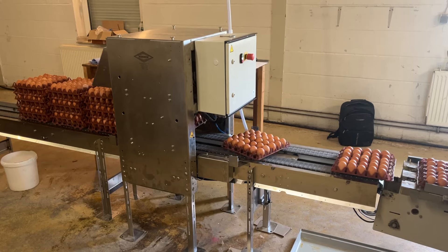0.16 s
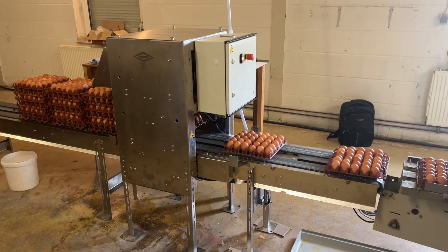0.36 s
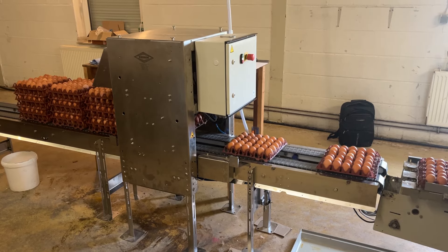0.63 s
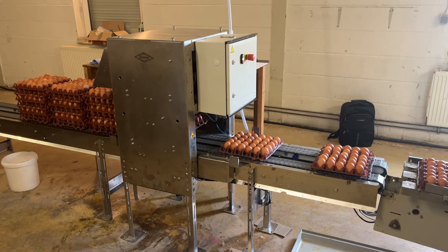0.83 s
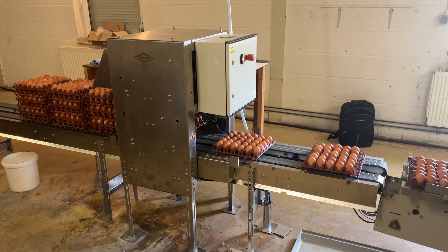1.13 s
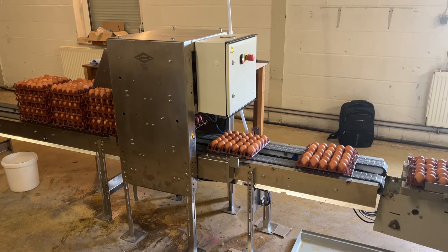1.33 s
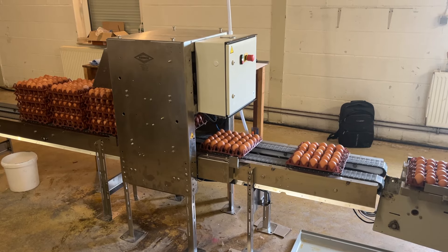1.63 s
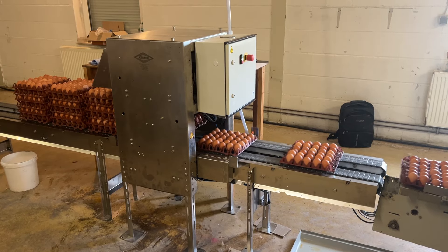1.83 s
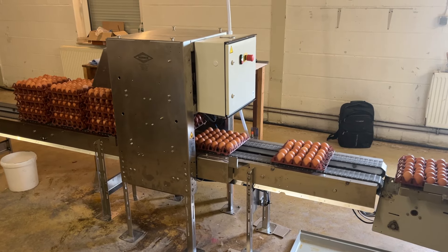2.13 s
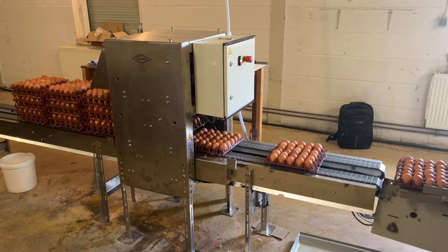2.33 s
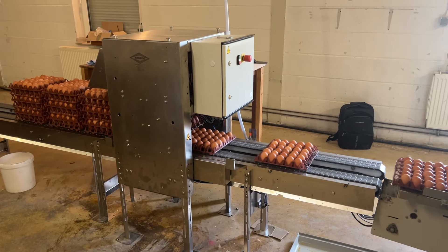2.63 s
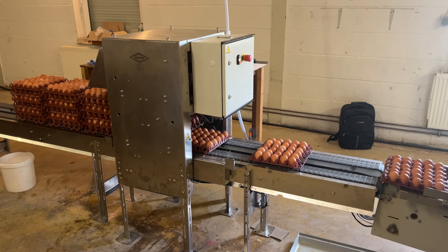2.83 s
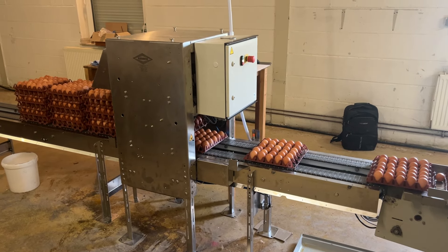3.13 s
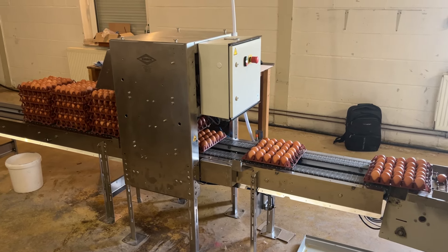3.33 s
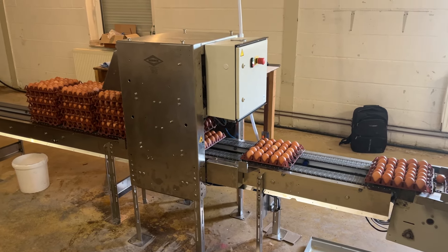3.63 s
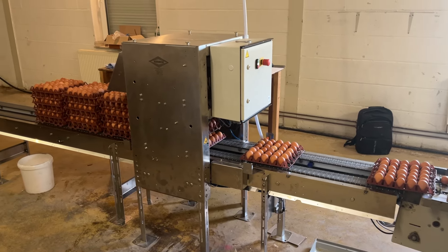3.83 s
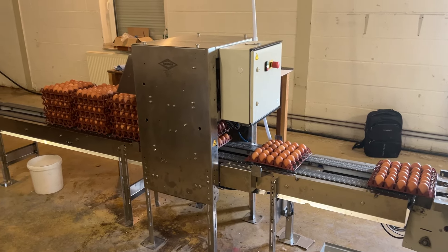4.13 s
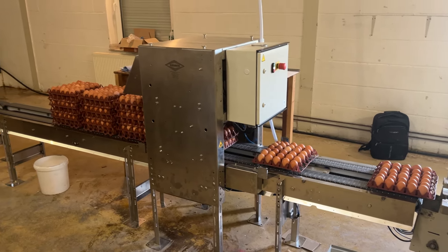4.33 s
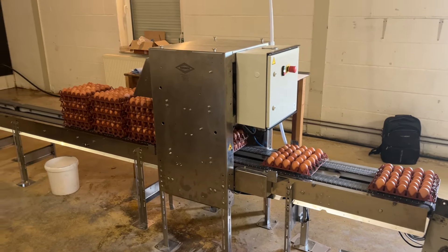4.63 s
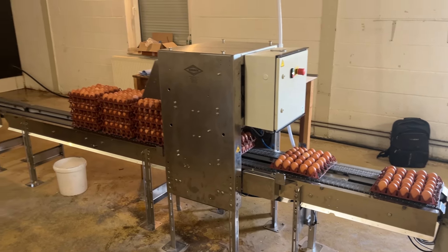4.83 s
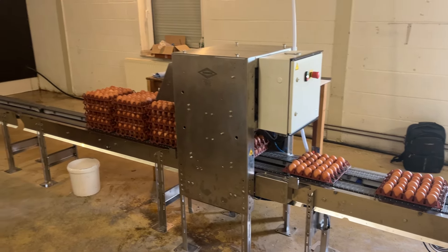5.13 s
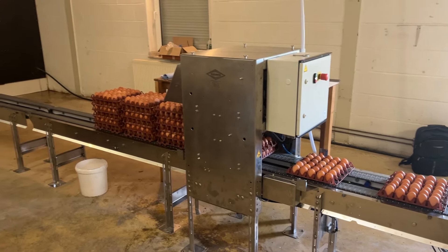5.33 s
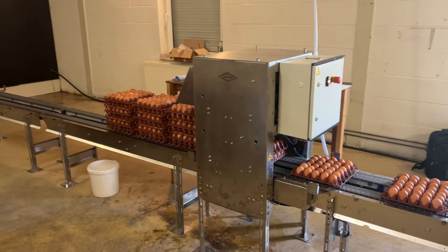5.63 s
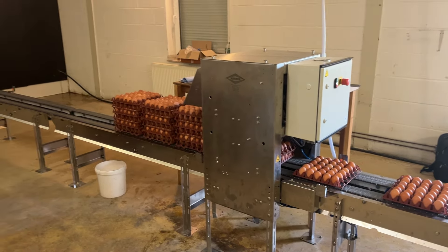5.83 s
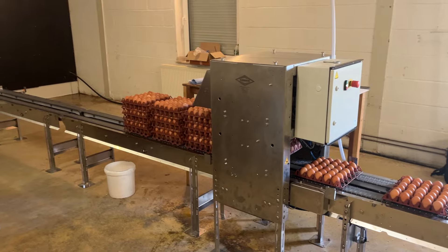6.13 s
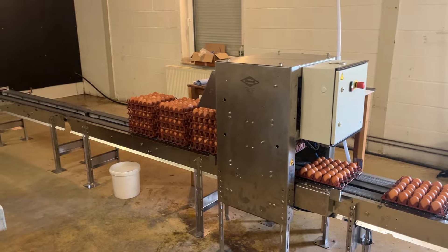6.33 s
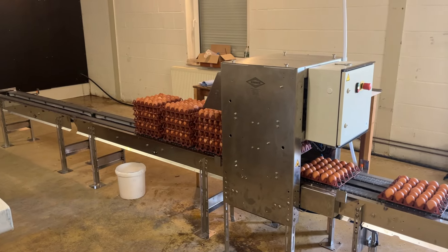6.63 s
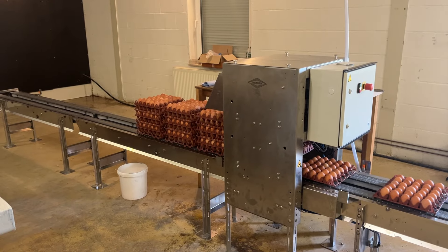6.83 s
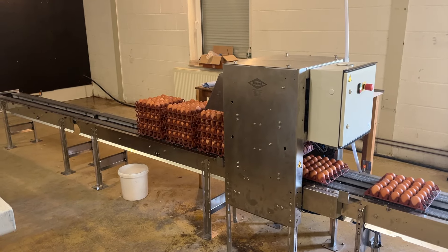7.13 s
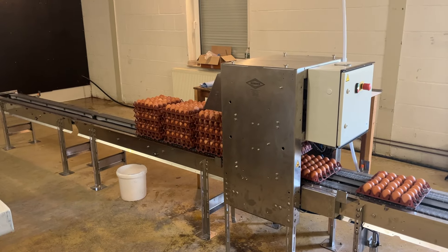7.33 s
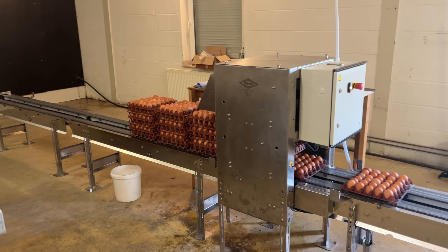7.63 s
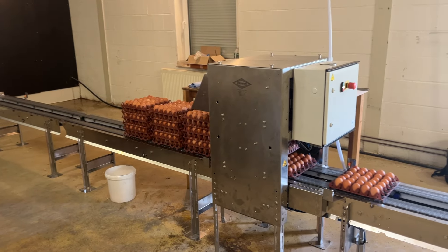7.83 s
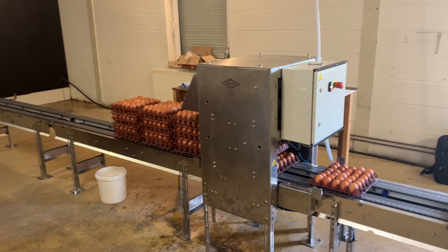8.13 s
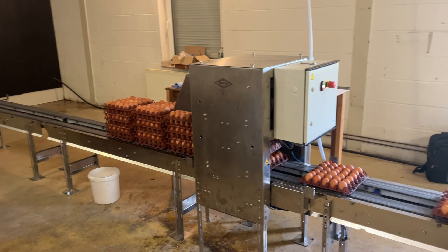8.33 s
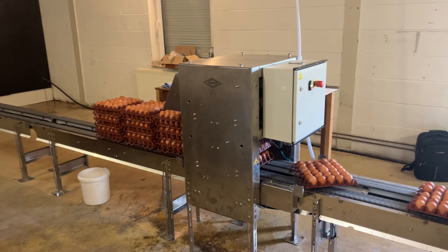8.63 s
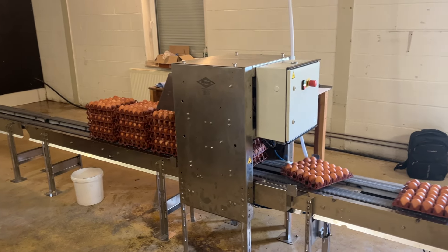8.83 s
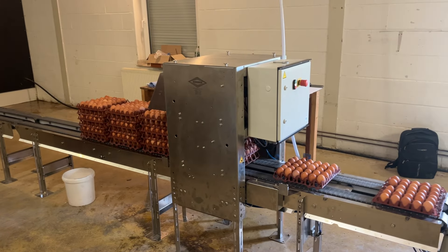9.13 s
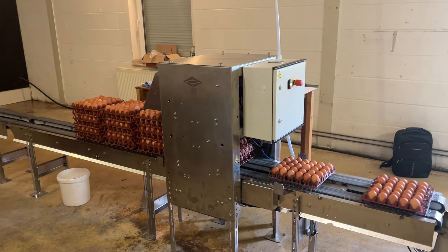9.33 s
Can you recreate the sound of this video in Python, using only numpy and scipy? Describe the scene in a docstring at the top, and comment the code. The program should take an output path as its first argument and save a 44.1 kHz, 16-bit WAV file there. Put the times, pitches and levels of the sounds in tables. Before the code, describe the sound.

An egg-tray stacking line runs without stopping. The first conveyor stroke is soft; later ones repeat evenly as rattling links with a mid-high metallic chirp. Lifting gear thuds and clanks inside a steel box, growing denser and heavier around the middle. Trays clack sharply, with clustered squeaks just after five seconds and again near the end. A close stereo pair hears low machine roar, fine hiss and hard-walled room echo.

```python
"""Bare concrete packing room; a closely spaced microphone pair a few metres from an egg-tray stacker.
From the start its frame rumbles, and the chain conveyor chatters and chirps in even strokes, the first softest.
Knocks of the lifting gear boom in the housing from 0.1 s on, and the lower middle dips briefly at 0.3 s.
From 0.5 s plastic trays clack on the rails; scrapes and squeaks follow at once, then cluster at 5.1 and 9.4 s.
Showers of tiny contacts pass through filters and resonances; the chirps and squeaks are wavering sines."""
import sys
import numpy as np
from scipy import signal
from scipy.fft import rfft, irfft, next_fast_len
from scipy.io import wavfile

SR = 44100
rng = np.random.default_rng(int(sys.argv[2]) if len(sys.argv) > 2 else 0)


def to_wav(s):
    """Save 16-bit WAV."""
    ch = np.atleast_2d(s).T  # columns
    pcm = np.round(np.clip(ch, -1, 1) * 32767)  # PCM
    wavfile.write(sys.argv[1], SR, pcm.astype(np.int16))


N = 417627
TIME = np.arange(N) / SR
SIZE = 2 * next_fast_len(N // 2 + SR // 2)
FREQS = np.maximum(np.fft.rfftfreq(SIZE, 1 / SR), 1)

# the first links of each stroke carry the load
FIRST_STROKE_S, STROKE_EVERY_S, LINK_EVERY_S, LAST_LOADED_LINK = 0.058, 0.8713, 0.0655, 3

# level (dB), loss per link (dB) and dying time (s) of the chatter; then the grind and chirp in the teeth
CHATTER_DB, CHATTER_FADE_DB, CHATTER_DYING_S = -22, 1.5, 0.027
CHIRP_DB, GRIND_DB, SLACK_LOSS_DB, CHIRP_DYING_S = -18, -24.5, 5.5, 0.01
SPROCKET_HZ, RUB_LEAD_S, LINK_UNEVEN_DB = 2215, 0.003, 1.5
# Resonances of the sprocket. Each row: pitch in Hz, width in Hz, relative level in dB.
SPROCKET_MODES = [(1330, 70, -12), (2060, 140, -10), (2222, 35, -8), (2400, 220, -7)]
# Colour of the link chatter. Each row: frequency in Hz, relative density in dB per Hz.
LINK_COLOUR = [(200, -4.5), (500, 8), (900, 3), (1400, 17.5), (1800, 3), (2500, -4), (4000, -3), (7000, 0),
               (14000, -32)]


def chain():
    """Links chatter onto the sprocket; each grinds into its tooth and chirps at an unsteady pitch."""
    hits, grinds, rubs = [], [], []
    for s, k, db, chirp_db in links():
        # a loaded link grinds and chirps much more readily than a slack one
        slack_db = SLACK_LOSS_DB * max(k - LAST_LOADED_LINK, 0)
        hit_db = db + rng.normal(0, LINK_UNEVEN_DB) + CHATTER_DB - CHATTER_FADE_DB * k
        hits.append((s, hit_db, CHATTER_DYING_S))
        grinds.append((s - RUB_LEAD_S, db + GRIND_DB - slack_db, CHIRP_DYING_S))
        rubs.append((s - RUB_LEAD_S, chirp_db + CHIRP_DB - slack_db, CHIRP_DYING_S))
    chatter = contacts(7000, 2) * blows(hits, rise_s=.003)
    hz = SPROCKET_HZ * (1 + .026 * drift(1000) + .007 * drift(25))
    chirp = np.sin(2 * np.pi * np.cumsum(hz) / SR) * blows(rubs, rise_s=.006)
    grinding = contacts(4000, 1) * blows(grinds, rise_s=.006)
    return chirp + resonate(grinding, SPROCKET_MODES) + coloured(chatter, LINK_COLOUR)


# Strokes in turn. Each row: relative strength in dB, then the relative chirp of its four loaded links in dB.
STROKE_STRENGTHS = [(-7.5, 0, -15, -2.5, 0), (-2.5, 0, 0.5, 0.5, 0), (-2, -1, 0, 2, 4.5),
                    (-0.5, 0, 5.5, 1.5, 5), (0, -4, 3.5, -2, -1), (0, -3, -5, -1, -4),
                    (1.5, -0.5, 3, -8, 3), (0.5, -3, 0.5, -3, -5), (0, -5, -1, 0, -2), (0, -8, -8, 2, 2),
                    (0.5, 0, 0, 4, 3.5)]


def links(count=7):
    """(s, place in its stroke, strength dB, chirp dB) of every link that meets the sprocket."""
    rows = []
    for start, (db, *chirps) in zip(strokes(), STROKE_STRENGTHS):
        for k in range(count):
            chirp_db = chirps[k] if k < len(chirps) else np.mean(chirps)
            rows.append((start + (k + .5) * LINK_EVERY_S, k, db, chirp_db))
    return rows


def strokes():
    """Start times of the conveyor's strokes, strictly in time."""
    return np.arange(FIRST_STROKE_S, N / SR, STROKE_EVERY_S)


def travel(start_s=0.011, run_s=0.44, coast_s=0.07):
    """Motion of the chain, 0 at rest to 1: it starts up, runs and coasts to a stop in every stroke."""
    age = (TIME - FIRST_STROKE_S) % STROKE_EVERY_S
    return np.minimum(age / start_s, 1) * np.exp(-np.maximum(age - run_s, 0) / coast_s)


# Colour of small bright ticks. Each row: frequency in Hz, relative density in dB per Hz.
TICK_COLOUR = [(500, -24), (1500, -9), (3000, -5), (5000, -2), (8000, 0), (12000, 0), (15000, -7)]


def rollers(hiss_db, count=26):
    """The conveyor's rollers tick twice per link with uneven force, among stray little clicks."""
    times = np.ravel(strokes()[:, None] + np.arange(count) * LINK_EVERY_S / 2)
    forces_db = 5.5 + 2.5 * rng.standard_normal(len(times))
    even = blows([(s, db, .0028) for s, db in zip(times, forces_db)], rise_s=.0003)
    stray = from_db(-15) * contacts(25, 4)
    return from_db(hiss_db) * coloured(contacts(7000, 0.85) * even + stray, TICK_COLOUR)


SNAP_DB, SNAP_FALL_DB = -21.5, 2.5  # the fall is per link away from the last loaded one
# The pawl catches and lets go. Each row: seconds into the stroke, relative level in dB.
PAWL_CLICKS = [(0.0, -26), (0.488, -21.5)]


def ticks():
    """Bright contacts: the pawl catches and lets go; links snap on their guides as the load comes off."""
    snaps = [(s, db + SNAP_DB - SNAP_FALL_DB * abs(k - LAST_LOADED_LINK)) for s, k, db, _ in links()]
    snaps += [(s + after, db) for s in strokes() for after, db in PAWL_CLICKS]
    uneven = [(s, db + rng.normal(0, LINK_UNEVEN_DB), .0035) for s, db in snaps]
    return coloured(contacts(14000, 1.2) * blows(uneven, rise_s=.0008), TICK_COLOUR)


TRAY_KNOCK_DB = 0  # a tray's knock on the housing, against its clack
LIFT_CRACK_DB = -3.5  # noisy crack of a lifting knock, against its clank
LIFT_THUD_DB = -10.5  # dull thud of a lifting knock, against its boom
# The drive brakes, stops and swings back.
# Each row: seconds into the stroke, relative knock in dB, relative thud in dB.
DRIVE_KNOCKS = [(0.425, -49, -29), (0.492, -29, -34.5), (0.56, -50, -33.5), (0.608, -27.5, -43),
                (0.644, -26, -27), (0.785, -29, -36)]
# Colours of knock and thud. Each row: frequency in Hz, relative density in dB per Hz.
KNOCK_COLOUR = [(150, -38), (420, -4.5), (600, -7.5), (800, -3.5), (1500, 1), (1800, -13.5), (2600, -10.5),
                (4500, -12), (12000, -30)]
THUD_COLOUR = [(25, -14), (55, 16), (90, -0.5), (170, 12), (300, 9.5), (450, 1.5), (800, 0.5), (3000, -44)]
# Resonances of the steel frame. Each row: pitch in Hz, width in Hz, relative level in dB.
FRAME_MODES = [(83.6, 7.8, -14), (163, 16, -16), (231, 33, -16.5), (306, 10, -26)]


def stacker(load_db):
    """The drive, lifting gear and landing trays knock on the housing and make its frame boom."""
    # the drive knocks harder when the whole line works harder
    loads = np.interp(strokes(), TIME, load_db)
    hits = []
    for s, load in zip(strokes(), loads):
        hits += [(s + after, knock_db + load, thud_db + load) for after, knock_db, thud_db in DRIVE_KNOCKS]
    hits += [(s, db + TRAY_KNOCK_DB, thud_db) for s, db, *_, thud_db in TRAY_CLACKS]
    hits += [(s, knock_db + LIFT_CRACK_DB, boom_db + LIFT_THUD_DB)
             for s, knock_db, boom_db, favoured in LIFT_KNOCKS]
    knocks = contacts(6000, 2.1) * blows([(s, db, .022) for s, db, _ in hits], rise_s=0.0017)
    thuds = contacts(6000, 1.0) * blows([(s, db, .026) for s, _, db in hits], rise_s=0.0077)
    return coloured(knocks, KNOCK_COLOUR) + coloured(thuds, THUD_COLOUR) + resonate(thuds, FRAME_MODES)


# a mode's loss per octave away from the favoured pitch, and the most it loses (dB)
HOUSING_FOCUS_DB, HOUSING_MOST_LOSS_DB = 19, 18
# The lifting gear sets trays down in the housing. Each row: start in seconds, relative knock in dB,
# relative boom in dB, pitch in Hz that the point of contact favours.
LIFT_KNOCKS = [(0.119, -36, -28.5, 303), (0.152, -31, -25.5, 520), (0.214, -28.5, -29, 271),
               (0.246, -38, -35, 139), (0.347, -32, -44, 200), (0.414, -31, -45, 200),
               (0.693, -26, -35, 300), (0.979, -23, -33, 305), (1.095, -44, -26, 80),
               (1.125, -42, -26.5, 200), (1.359, -44, -23.5, 480), (1.571, -26.5, -27, 151),
               (1.85, -32, -23, 500), (1.903, -24, -26, 300), (1.968, -28, -27, 278), (2.01, -38, -29, 135),
               (2.166, -34, -35, 300), (2.428, -30, -40, 296), (2.707, -24, -20.5, 580),
               (2.961, -38, -42, 300), (3.105, -26, -21, 470), (3.16, -24, -22, 170),
               (3.308, -22.5, -24, 470), (3.458, -39, -24.5, 500), (3.651, -22, -39, 470),
               (4.118, -42, -20, 62), (4.199, -30, -28, 260), (4.447, -27, -23.5, 570),
               (4.60, -30, -28, 400), (4.658, -26, -21, 260), (4.718, -24, -21, 70),
               (4.908, -32, -21.5, 300), (4.98, -20.5, -21, 168), (5.136, -18, -20, 132),
               (5.298, -36, -21.5, 283), (5.32, -25, -27, 563), (5.365, -34, -26, 400),
               (5.612, -41, -19.5, 115), (5.709, -34, -22.5, 457), (5.808, -26, -13.5, 67),
               (6.193, -27, -32, 387), (6.254, -25, -24, 252), (6.321, -22, -23, 550),
               (6.384, -25, -21, 80), (6.45, -31, -32, 385), (6.665, -27, -38, 380), (6.718, -38, -22, 530),
               (7.192, -30, -29, 305), (7.263, -28, -39, 305), (7.312, -27, -35, 305),
               (7.455, -32, -24, 490), (7.517, -28, -22, 199), (7.672, -31, -16.5, 183),
               (7.83, -26, -24, 260), (7.998, -20.5, -37, 560), (8.328, -37, -25, 500),
               (8.385, -44, -21.5, 250), (8.447, -44, -21, 168), (8.537, -26, -33, 504),
               (8.864, -21, -28, 600), (9.048, -40, -19, 135), (9.220, -28, -21, 474),
               (9.278, -42, -24, 200)]
# Modes of the steel housing. Each row: pitch in Hz, 60 dB decay in seconds, relative level in dB.
HOUSING_MODES = [(56, 0.15, 1), (79, 0.18, -0.5), (108.5, 0.26, -2), (134.6, 0.25, -3), (162, 0.26, 0),
                 (211, 0.22, -1), (256.4, 0.24, -4), (301.7, 0.28, 1.5), (378, 0.19, -2.2),
                 (464.5, 0.17, -1.5), (519.5, 0.35, -4.5), (593.5, 0.28, -1.5)]


def booms():
    """Each knock of the lifting gear rings the housing: deep on the frame, higher on a panel."""
    rows = [(s, boom_db, favoured) for s, knock_db, boom_db, favoured in LIFT_KNOCKS]
    return struck(rows, HOUSING_MODES, HOUSING_FOCUS_DB, HOUSING_MOST_LOSS_DB)


# Resonances of the outer panels. Each row: pitch in Hz, width in Hz, relative level in dB.
PANEL_MODES = [(660, 28, -6), (830, 30, -8), (970, 28, -6), (1090, 30, -6), (1185, 28, -5), (1330, 28, -3),
               (1420, 34, -7), (1520, 28, -3), (1850, 40, -10), (2420, 45, -9)]


def clanks():
    """The hard edge of each lifting knock makes the thin outer panels clank."""
    force = blows([(s, db, .01) for s, db, *_ in LIFT_KNOCKS], rise_s=.003)
    return resonate(contacts(9000, 1) * force, PANEL_MODES)


SETTLE_S = 0.008  # from a tray's first touch to its full blow on the rail
RAIL_FOCUS_DB, RAIL_MOST_LOSS_DB = 85, 13  # per octave off the favoured pitch, and at most
# Trays clacking on the rails. Each row: first touch in seconds, relative clack in dB, dying time in seconds,
# relative rail ring in dB, pitch in Hz that the point of contact favours, relative thud in dB.
TRAY_CLACKS = [(0.511, -27.5, 0.021, -34, 4460, -46), (0.984, -25, 0.0085, -35, 5800, -31),
               (1.611, -31.5, 0.026, -28.5, 5950, -48), (2.289, -32.5, 0.0087, -36.5, 4820, -33),
               (3.504, -22, 0.012, -29, 10800, -22), (4.112, -29, 0.025, -50, 6900, -36),
               (4.508, -29.5, 0.032, -35, 5800, -21), (4.704, -32.5, 0.027, -33, 6900, -26),
               (4.849, -38.5, 0.059, -34, 11050, -31), (5.012, -28.5, 0.025, -38, 6950, -26),
               (5.402, -31, 0.04, -27, 6400, -20.5), (5.489, -21, 0.0048, -41, 6960, -41),
               (5.799, -25.5, 0.021, -26.5, 4680, -30), (7.518, -26.5, 0.0048, -46, 6900, -27),
               (7.802, -23.5, 0.02, -27.5, 4400, -25), (8.304, -26, 0.023, -25.5, 5700, -36),
               (8.614, -29, 0.024, -30.5, 5105, -22), (9.010, -30, 0.032, -35, 6900, -27),
               (9.208, -32, 0.043, -30, 4440, -16.5), (9.317, -27, 0.023, -33, 4400, -41)]
# Colour of the clacks. Each row: frequency in Hz, relative density in dB per Hz.
CLACK_COLOUR = [(300, -20), (1000, -6), (2200, -6), (3700, -3), (4700, -1), (6500, 1), (8500, 0.5),
                (11000, -1), (13000, -6), (15000, -13)]
# Modes of the tray rail. Each row: pitch in Hz, 60 dB decay in seconds, relative level in dB.
RAIL_MODES = [(2830, .18, -1), (3630, .16, 3), (3760, .14, 3), (4200, .14, -1), (4330, .16, -2),
              (4440, .22, -1), (4570, .18, 0), (4690, .17, -1), (4820, .2, 0), (5105, .22, 1),
              (5480, .16, -3), (5600, .18, -2), (5800, .2, 0), (6160, .18, 0), (6520, .17, 0),
              (6870, .15, 0), (7070, .2, 0), (10750, .14, -1), (11050, .18, -2)]


def trays():
    """A clack is a quick shower of contacts as a ribbed tray settles and sets the rail ringing."""
    force = blows([(s, db, dying) for s, db, dying, *_ in TRAY_CLACKS], rise_s=.006)
    clacks = coloured(contacts(6000, 2.0) * force, CLACK_COLOUR)
    rings = [(s + SETTLE_S, ring_db, favoured) for s, db, dying, ring_db, favoured, thud_db in TRAY_CLACKS]
    return from_db(8.0) * clacks + struck(rings, RAIL_MODES, RAIL_FOCUS_DB, RAIL_MOST_LOSS_DB)


# A tray scraping along the guide. Each row: start in seconds, length in seconds, relative level in dB.
TRAY_SCRAPES = [(0.558, 0.12, -36), (5.05, 0.14, -33.5), (9.376, 0.099, -30.5)]
# Resonances of the guide rail. Each row: pitch in Hz, width in Hz, relative level in dB.
GUIDE_MODES = [(2215, 52, -4.5), (2470, 89, -3.5), (2790, 130, -7), (4650, 44, -10), (6400, 160, 0.5),
               (7470, 190, 0), (10000, 240, -0.5)]


def scrapes():
    """Stick and slip: a shower of tiny slips excites the guide rail and hisses."""
    push = sum(from_db(db) * swell(s, length) for s, length, db in TRAY_SCRAPES)
    slips = contacts(2500, 0.77) * push
    return from_db(-6.0) * resonate(slips, GUIDE_MODES) + from_db(-1.5) * coloured(slips, HISS_COLOUR)


TONE_FLICKER_DB = 3.5  # spread of the tones' unsteady level
# Short wavering tones: squeaks, a late link chirp at 7.4 s, a rough rattle at 4.9 s. Each row: start in seconds,
# length in seconds, first pitch in Hz, last pitch in Hz, waver as a share of the pitch, relative level in dB.
SHORT_TONES = [(0.566, 0.04, 2900, 2720, 0.016, -33), (0.584, 0.082, 7950, 7730, .012, -34),
               (0.59, 0.053, 10300, 10300, 0.0079, -46), (0.637, 0.073, 2700, 2520, .015, -33),
               (0.532, 0.24, 4530, 4470, 0.0083, -42), (0.574, 0.06, 2270, 2260, 0.015, -39),
               (4.857, 0.15, 4750, 4550, 0.038, -35), (7.375, 0.045, 2250, 2200, 0.03, -37),
               (1.266, 0.034, 7800, 7920, .005, -31), (2.28, 0.038, 7640, 8000, 0.0056, -28),
               (3.672, 0.074, 7500, 7780, 0.0052, -22), (3.737, 0.051, 7850, 8000, .005, -29),
               (5.045, 0.024, 3260, 3060, 0.016, -32), (5.056, 0.032, 2920, 2665, 0.018, -27.5),
               (5.072, 0.028, 2315, 2220, 0.025, -36.5), (5.085, 0.024, 2800, 2660, 0.016, -32),
               (5.06, 0.04, 5400, 5430, .012, -32), (5.09, 0.075, 7900, 7650, 0.0117, -24),
               (5.108, 0.055, 2614, 2544, 0.0154, -29), (5.142, 0.04, 6300, 6500, 0.0113, -37),
               (5.161, 0.03, 2760, 2900, 0.018, -31), (5.182, 0.034, 2620, 2540, 0.0177, -34),
               (5.235, 0.06, 2540, 2600, 0.0154, -39), (8.055, 0.088, 7960, 7940, 0.004, -23),
               (8.377, 0.085, 7850, 8020, .005, -33), (9.386, 0.023, 2800, 2710, 0.024, -26),
               (9.389, 0.095, 7980, 7660, .014, -24), (9.422, 0.06, 2600, 2520, 0.05, -34)]


def short_tones():
    """Gliding tones share one random waver of pitch and one of level."""
    unsteady = drift(500)
    flicker = from_db(TONE_FLICKER_DB * drift(120))
    out = 0
    for s, length, first_hz, last_hz, waver, db in SHORT_TONES:
        out = out + from_db(db) * flicker * glide(s, length, first_hz, last_hz, waver * unsteady)
    return out


def glide(s, length, first_hz, last_hz, waver):
    """A swelling sine that glides with an unsteady pitch."""
    hz = np.interp(TIME, [s, s + length], [first_hz, last_hz]) * (1 + waver)
    return swell(s, length) * np.sin(2 * np.pi * np.cumsum(hz) / SR)


# Colour of the shake. Each row: frequency in Hz, relative density in dB per Hz.
SHAKE_COLOUR = [(18, -47), (26, -26), (36, -1), (52, -3.5), (78, 8.5), (105, -1), (150, -6.5), (300, -40)]


def shake(bass_db, moving):
    """Deep trembling made of dense contacts, a little weaker while the chain moves."""
    level_db = bass_db - 0.5 - 0.9 * moving
    return bed(SHAKE_COLOUR, level_db, per_s=3000, spread_db=2.0, flutter_db=0.0, flutter_rate=6.4)


# Colour of the rumble. Each row: frequency in Hz, relative density in dB per Hz.
RUMBLE_COLOUR = [(60, -27), (110, 0.5), (155, 3), (225, -1), (305, 3), (410, -2), (520, -1), (630, -3.5),
                 (800, -9.5), (1500, -23.5), (4000, -58)]


def rumble(middle_db, moving):
    """The steel frame's low roar, made of dense contacts, hardly stronger while the chain moves."""
    level_db = middle_db - 1.5 + 0.26 * moving
    return bed(RUMBLE_COLOUR, level_db, per_s=2000, spread_db=1.5, flutter_db=1.5, flutter_rate=18)


# Colour of the rattle. Each row: frequency in Hz, relative density in dB per Hz.
RATTLE_COLOUR = [(250, -20), (550, -1), (800, -1), (1200, 3), (1590, 4), (1730, -1), (2300, 0),
                 (3200, -2.5), (5000, -9), (9000, -28.5)]


def rattle(middle_db, moving):
    """Contacts in the middle range, stronger while the chain moves."""
    level_db = middle_db - 4.5 + 2.5 * moving
    return bed(RATTLE_COLOUR, level_db, per_s=4000, spread_db=0.0, flutter_db=1.48, flutter_rate=45)


# Colour of the hiss. Each row: frequency in Hz, relative density in dB per Hz.
HISS_COLOUR = [(1200, -30), (3000, -6), (4700, -.5), (6200, -.5), (8000, -.5), (10200, -2.5), (12500, -7),
               (14200, -11), (15000, -20)]


def hiss(hiss_db):
    """Fine dense contacts in the treble with a fluttering level."""
    return bed(HISS_COLOUR, hiss_db, per_s=12000, spread_db=2.0, flutter_db=2.0, flutter_rate=30)


# Resonances of the motor. Each row: pitch in Hz, width in Hz, level in dB.
MOTOR_MODES = [(70.7, 2.4, -57), (167, 14, -58), (521, 14, -47.5), (604, 3.4, -53), (9970, 130, -55)]


def hum():
    """White noise excites the motor's narrow resonances."""
    return resonate(rng.standard_normal(N), MOTOR_MODES)


def bed(spectrum, level_db, per_s, spread_db, flutter_db, flutter_rate):
    """Countless overlapping contacts, arriving from all sides."""
    pair = np.array([contacts(per_s, spread_db), contacts(per_s, spread_db)])
    return coloured(diffuse(pair), spectrum) * from_db(level_db + flutter_db * drift(flutter_rate))


ROOM_T60_S = 0.97  # below 3500 Hz


def room(x, wet_db, treble_t60_s):
    """Direct sound plus a dense tail from the concrete walls, whose treble dies first."""
    age = TIME[:SR]
    noise = rng.standard_normal((2, SR))
    low = signal.sosfilt(signal.butter(2, 3500, fs=SR, output="sos"), noise)
    high = signal.sosfilt(signal.butter(2, 3500, "high", fs=SR, output="sos"), noise[:, ::-1])
    tail = low * from_db(-60 * age / ROOM_T60_S) + high * from_db(-60 * age / treble_t60_s)
    tail = rms_one(tail * (age > .003)) / np.sqrt(SR)
    echoes = signal.fftconvolve(x[None], tail, axes=1)[:, :N]
    return x + from_db(wet_db) * diffuse(echoes)


# Likeness of left and right. Each row: frequency in Hz, likeness from 0 to 1; left and right are nearly alike
# at the top.
CHANNEL_LIKENESS = [(80, .999), (160, .98), (300, .93), (600, .7), (800, .2), (1200, .35), (1550, .7),
                    (3000, .55), (5500, .35), (7000, .85), (8200, .96), (12000, .96)]


def diffuse(pair):
    """Two unrelated signals become a left and a right whose likeness depends on frequency."""
    alike = np.clip(over_hz(CHANNEL_LIKENESS), 0, 1)
    mid, side = rfft(pair, SIZE) * np.sqrt([(1 + alike) / 2, (1 - alike) / 2])
    return irfft([mid + side, mid - side])[:, :N]


# The brief dip, in one row: start in seconds, length in seconds, depth in dB.
LULL = (0.28, 0.23, -9.5)
# Band of the dip, in one row: lower edge in Hz, upper edge in Hz.
LULL_BAND_HZ = (330, 770)


def lull(x):
    """The lower middle of the whole sound dips briefly."""
    s, length, depth_db = LULL
    band = signal.sosfiltfilt(signal.butter(2, LULL_BAND_HZ, "band", fs=SR, output="sos"), x)
    return x + band * (from_db(depth_db * swell(s, length)) - 1)


def contacts(per_s, spread_db):
    """Tiny random contacts of uneven size; rms one."""
    sizes = from_db(spread_db * np.minimum(rng.exponential(1, N), 4)) * rng.choice([-1, 1], N)
    return rms_one(sizes * (rng.random(N) < per_s / SR))


def blows(rows, rise_s):
    """Force of blows (s, dB, dying time) that swell quickly and die away, added as power."""
    power = np.zeros(N)
    for s, db, dying_s in rows:
        at = int(np.clip(s * SR, 0, N - 1))
        age = TIME[:min(N - at, SR // 2)]
        force = from_db(db) * (1 - np.exp(-age / rise_s)) * np.exp(-age / dying_s)
        power[at:at + len(age)] += force ** 2
    return np.sqrt(power)


def struck(rows, modes, focus_db, most_loss_db):
    """Blows (s, dB, favoured Hz) ring modes; those far from the favoured pitch are hardly struck."""
    s, db, favoured = np.transpose(rows)
    chance = rng.standard_normal((len(s), len(modes)))
    out = 0
    for (hz, t60, mode_db), luck in zip(modes, chance.T):
        loss = np.minimum(focus_db * np.abs(np.log2(hz / favoured)), most_loss_db)
        clicks = np.zeros(N)
        # chance sets both the sign and a few dB of each blow
        clicks[np.clip(s * SR, 0, N - 1).astype(int)] = np.sign(luck) * from_db(db + mode_db - loss + luck)
        r, w = from_db(-60 / (t60 * SR)), 2 * np.pi * hz / SR
        out = out + signal.lfilter([0, np.sin(w)], [1, -2 * r * np.cos(w), r * r], clicks + 1e-18)
    return out


def resonate(x, modes):
    """Parallel resonances; white noise of rms one leaves each at its level."""
    out = 0
    for hz, width, db in modes:
        r, w = np.exp(-np.pi * width / SR), 2 * np.pi * hz / SR
        ring = signal.lfilter([0, np.sin(w)], [1, -2 * r * np.cos(w), r * r], x + 1e-18)
        out = out + from_db(db) * np.sqrt(2 * (1 - r * r)) * ring
    return out


def coloured(x, spectrum):
    """Causal (minimum-phase) filter that keeps the power of white noise."""
    gain = rms_one(from_db(over_hz(spectrum)))
    cepstrum = irfft(np.log(gain))[:SIZE // 2]
    response = np.exp(2 * rfft(cepstrum, SIZE) - cepstrum[0])
    return irfft(rfft(x, SIZE) * response)[..., :N]


def swell(s, length):
    """A rounded push of height one."""
    return np.sqrt(np.maximum(1 - (2 * (TIME - s) / length - 1) ** 2, 0))


def drift(rate):
    """Random wander through so many points a second, with an rms of one."""
    knots = rng.standard_normal(12000)
    return rms_one(np.interp(TIME * rate, np.arange(len(knots)), knots))


def over_hz(points):
    """Read a table on a log-frequency axis."""
    hz, value = np.transpose(points)
    return np.interp(np.log(FREQS), np.log(hz), value)


def rms_one(x):
    """Scale to an rms of one."""
    return x / np.sqrt(np.mean(x ** 2) + 1e-20)


def from_db(db):
    """Decibels to gain."""
    return 10 ** (np.asarray(db) / 20)


# Slow relative level of the running line. Each row: time in seconds, bass in dB, middle in dB, treble in dB.
LINE_LEVEL = [(0.0, -36, -32, -38.5), (0.66, -48, -31.5, -37.5), (1.19, -39.5, -31, -35.5),
              (1.66, -44, -31, -36), (2.08, -35.5, -30.5, -35), (2.64, -47, -30, -37),
              (2.9, -36.5, -30, -34.5), (3.43, -45, -28.5, -35), (3.77, -39, -29, -32),
              (4.43, -43, -29, -34), (4.64, -35.5, -27, -31), (5.06, -34.5, -28.5, -30),
              (6.25, -34, -29.5, -34), (6.86, -40.5, -29.5, -35.5), (7.17, -37.5, -29, -32),
              (8.91, -37.5, -28, -31.5), (9.31, -35.5, -26, -30.5), (9.47, -33.5, -25.5, -36)]


def scene():
    """The steady line and its blows; conveyor and outer panels are nearer and drier than the inside."""
    s, *columns = np.transpose(LINE_LEVEL)
    bass_db, middle_db, treble_db = [np.interp(TIME, s, c) for c in columns]
    moving = travel()
    hiss_db = treble_db - 6.5 + 2 * moving
    steady = shake(bass_db, moving) + rumble(middle_db, moving) + rattle(middle_db, moving)
    steady = steady + hiss(hiss_db) + hum()
    near = chain() + rollers(hiss_db) + ticks() + booms() + clanks()
    far = trays() + stacker(middle_db - middle_db.mean()) + scrapes() + short_tones()
    outside = room(near, wet_db=-11, treble_t60_s=.3)
    inside = room(far, wet_db=-2.5, treble_t60_s=.5)
    return lull(steady + from_db(-2.5) * outside + from_db(-0.52) * inside)


CUTOFF_HZ = 15200
# Phase between the microphones. Each row: frequency in Hz, left lead in radians.
MIC_LEAD = [(90, 0), (600, -.6), (1000, -.9), (1620, -2.6), (1750, 0), (2800, 1), (4900, .6), (5700, -1.1),
            (6500, -1.2), (8400, -3.2), (12000, -6.3), (15200, -9.4)]
# Level between the microphones. Each row: frequency in Hz, left minus right in dB.
MIC_TILT = [(60, .4), (300, 1.3), (480, 0), (720, -2.8), (1100, -1.6), (1580, -3), (1750, 2.5), (2800, 2),
            (5300, 4.5), (8000, 0)]


def record(dry):
    """The two microphones differ in phase and level by frequency; the deepest bass and the top are cut."""
    half = np.exp(.5j * over_hz(MIC_LEAD)) * from_db(over_hz(MIC_TILT) / 2)
    heard = irfft(rfft(dry, SIZE) * [half, 1 / half])[:, :N]
    heard = signal.sosfilt(signal.butter(6, 33, "high", fs=SR, output="sos"), heard)
    return signal.sosfilt(signal.ellip(10, .2, 80, CUTOFF_HZ, fs=SR, output="sos"), heard)


dry = scene()
out = record(dry)
to_wav(out)
```